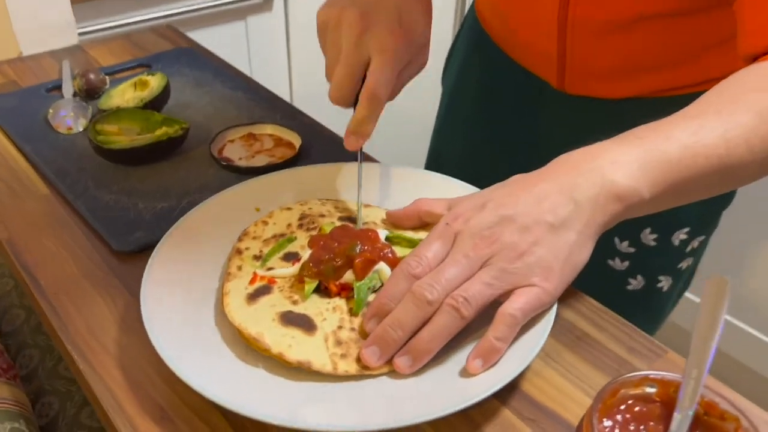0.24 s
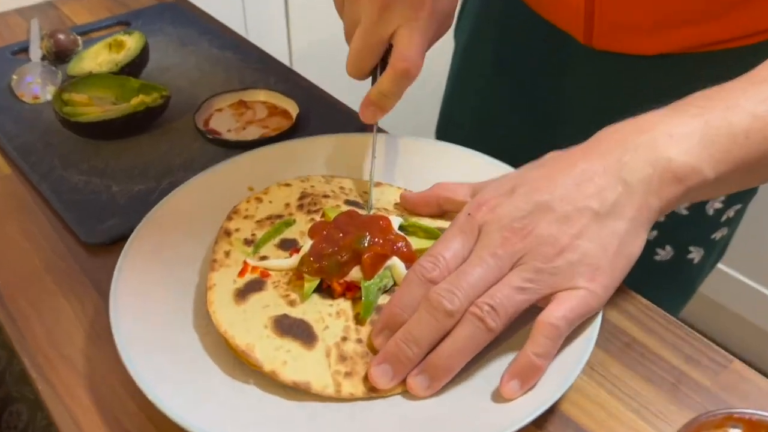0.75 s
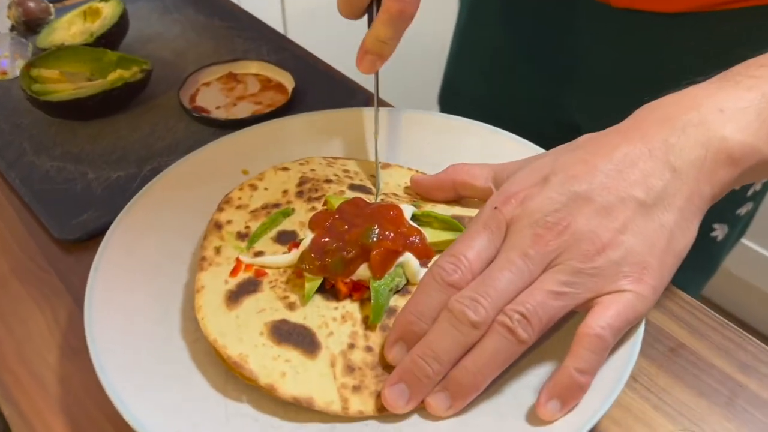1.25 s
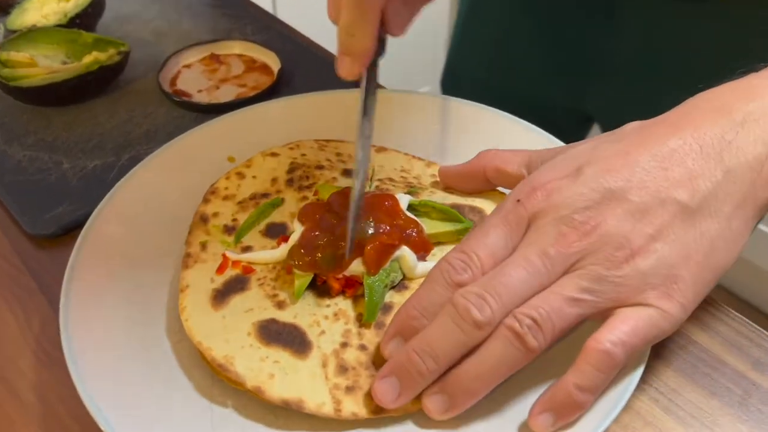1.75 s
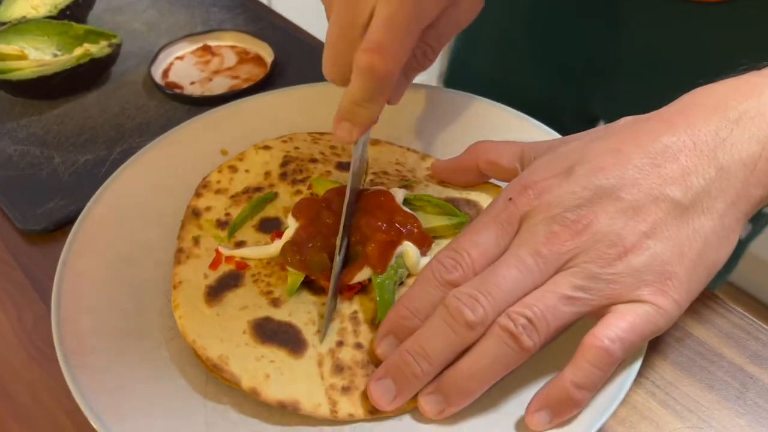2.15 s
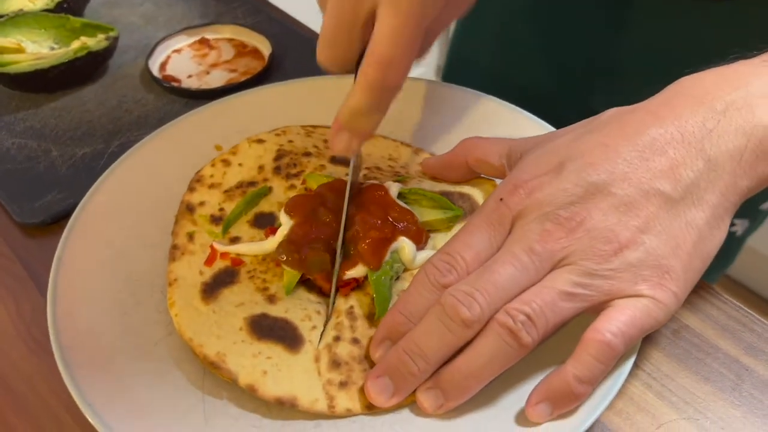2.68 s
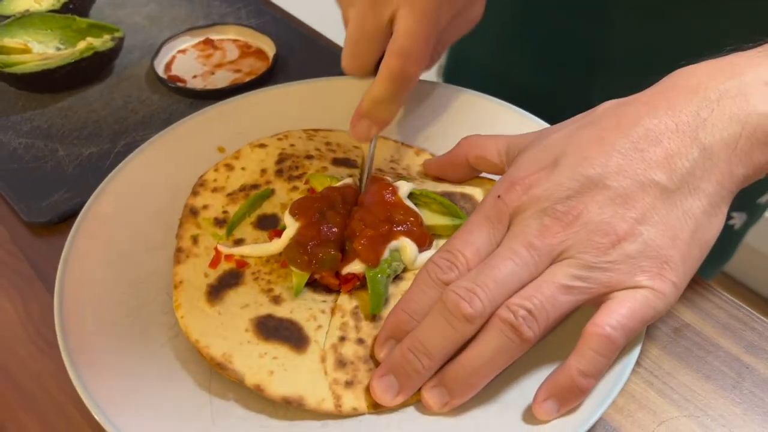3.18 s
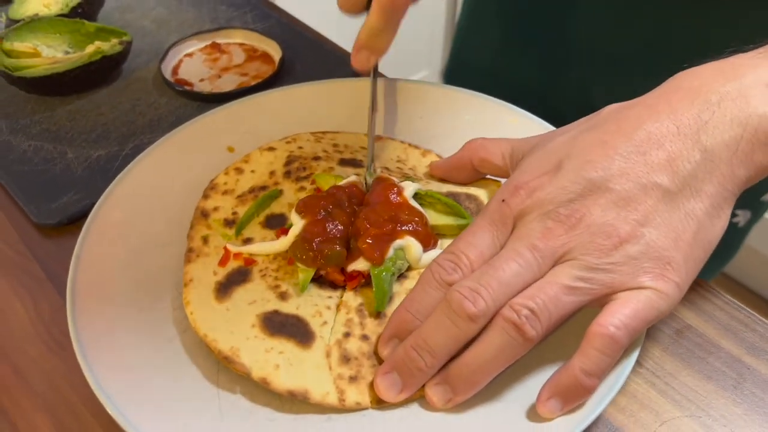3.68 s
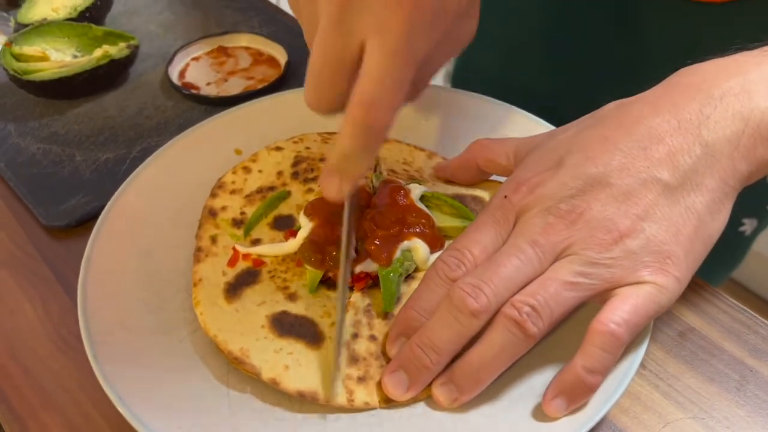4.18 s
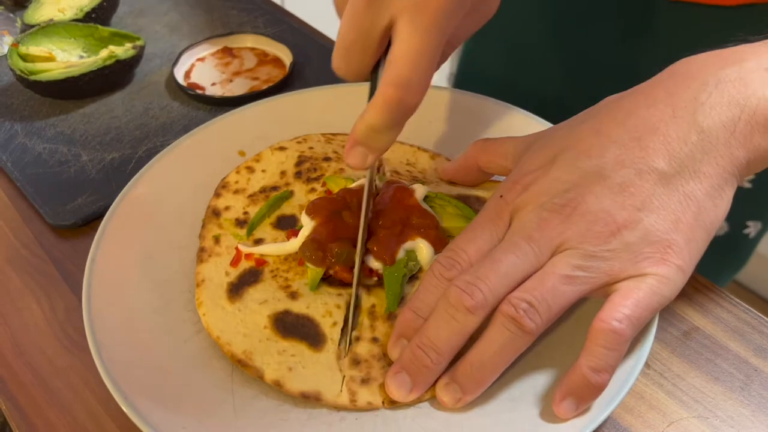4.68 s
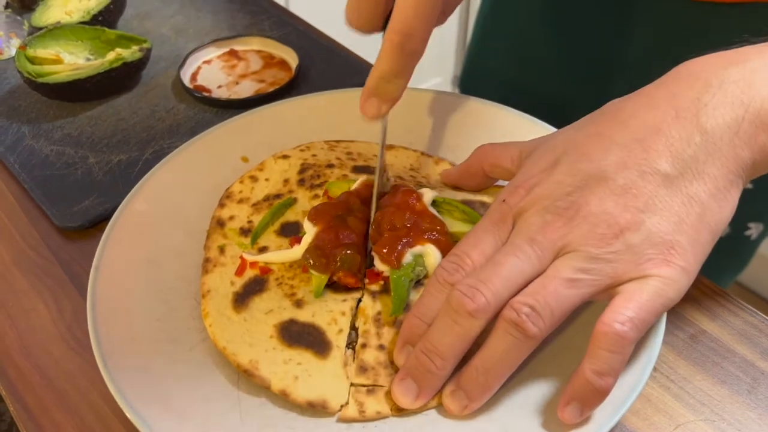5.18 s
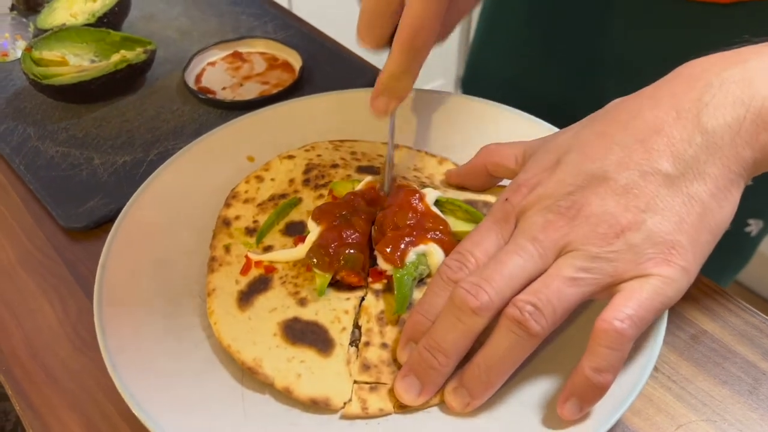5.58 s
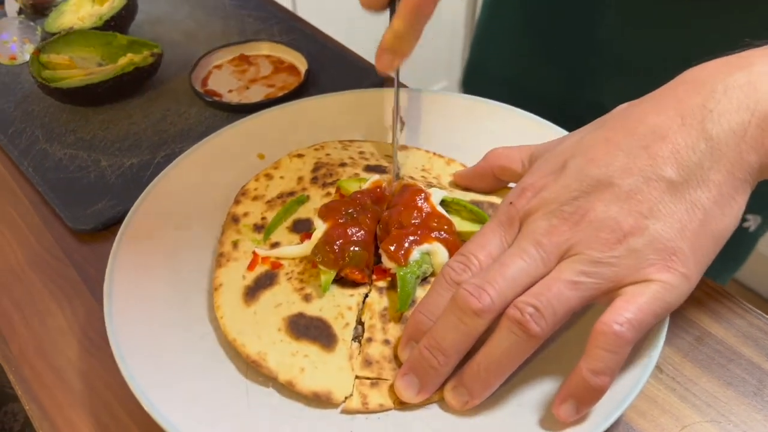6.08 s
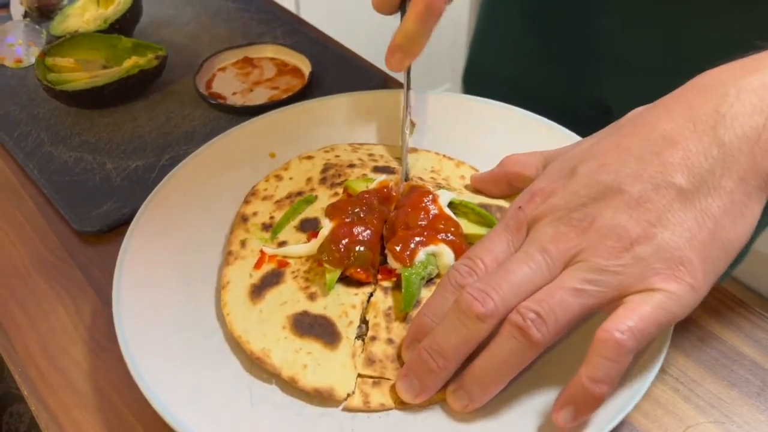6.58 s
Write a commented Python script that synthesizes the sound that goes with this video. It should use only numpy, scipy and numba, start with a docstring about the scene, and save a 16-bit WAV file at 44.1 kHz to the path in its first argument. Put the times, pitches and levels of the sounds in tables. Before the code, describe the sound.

Close stereo sound in a quiet small kitchen: a knife sawing crisp toasted flatbread on a china plate. From 0 to 0.5 s light, scratchy strokes; at 0.6 a harder rasp, and at about 0.8 a loud brittle crack with a plate knock and low thump. From 1 to 2 s it is nearly quiet, only faint brushing and soft slides. Crisp fine crackles return at 2.1-2.5, then firmer, lower rasps at 3.0, 3.25 and 3.6. A lull follows until 4.15. Between 4.2 and 4.75 comes the densest crunch: bright snaps, splintering crumbs and short ceramic knocks. After a brief pause, from 5.15 to the end at about 6.8, short regular strokes grind duller and slightly nasal, strongest near 5.4 and 5.7, with thin squeaky steel scrapes on china, soft filling rubs and muted worktop thumps.

```python
"""In a small kitchen, a knife saws to and fro through a crisp toasted flatbread on a china plate, heard close up.
Each stroke is noise gated by a stream of tiny crust fractures; larger flakes snap as sharp pulses through resonances.
Now and then the blade knocks the plate, whose modes ring; from the middle on, its edge scrapes the china.
The flat of the blade slides through the soft filling as filtered noise.
The worktop rumbles with the drag of the knife and thumps; reflections and a short diffuse tail surround it all."""
import sys
import numpy as np
from scipy import signal
from scipy.fft import rfft, irfft, next_fast_len
from scipy.io import wavfile
from scipy.ndimage import uniform_filter1d, map_coordinates
from numba import njit

SR = 44100
rng = np.random.default_rng(int(sys.argv[2]) if len(sys.argv) > 2 else 0)


def log_audio(samples):
    """Write samples as a 16-bit WAV file to the path given in sys.argv[1]."""
    # one column per channel
    frames = np.atleast_2d(samples).T
    # limit to full scale, then quantise
    limited = np.clip(frames, -1, 1)
    pcm = np.round(limited * 32767).astype(np.int16)
    wavfile.write(sys.argv[1], SR, pcm)


N = 301644

# Flakes of crust snapping. Each row: moment of the break in seconds, relative level of its first moments in dB,
# pitch in Hz, relative treble edge in dB, t60 of the splinters in seconds, relative hollow body of the bread in dB.
FLAKE_SNAPS = [(.148, -49, 3350, -25, 0.014, -22), (0.1904, -43, 2300, -33, .01, -22),
               (0.2714, -39, 2700, -5, 0.008, -18), (0.2917, -37.5, 2600, -27, 0.017, -27),
               (.593, -33, 4700, -19, 0.0044, -2), (.617, -29, 3000, -8.5, 0.0052, 0),
               (0.8125, -7.5, 4240, -9.5, 0.0059, -5.5), (0.8331, -11, 3740, -18.5, 0.0094, -12.5),
               (1.0, -38.5, 2400, -18, .011, -17), (1.0674, -39.5, 3620, -7.5, 0.0064, -19.5),
               (1.1597, -46.5, 4160, 2.5, 0.0057, -20), (1.776, -35, 2200, -44.5, 0.014, -14.5),
               (1.884, -45.5, 1195, -23, 0.013, -17.5), (1.965, -39, 1820, -36.5, .003, -6),
               (1.994, -40.5, 3950, -9, 0.01, -15), (2.0924, -35, 2160, -6, 0.034, -27),
               (2.1192, -31, 4300, -7.5, 0.0047, -10), (2.158, -32.5, 5000, 7, .006, -22),
               (2.199, -37, 2400, -8, .005, -11), (2.3306, -23.5, 12400, -4, 0.014, -16),
               (2.3412, -28.5, 12500, -5, 0.0024, -15.5), (2.4537, -23, 2540, -14.5, 0.006, -22),
               (2.461, -25.5, 13300, -16, 0.0035, -34), (2.4639, -27.5, 2100, -18.5, 0.0073, -15.5),
               (2.616, -41.5, 2640, -14, 0.0059, -7), (2.646, -35, 2670, -37, 0.011, -9),
               (2.7732, -36, 3050, -7, 0.0088, -21), (2.9287, -25.5, 2030, -17, 0.011, -9.5),
               (3.0122, -23.5, 1930, -21, 0.012, -11), (3.026, -27, 1910, -24, .008, -11),
               (3.208, -35.5, 1900, -18, 0.037, -6.5), (3.2365, -27.5, 2100, -20.5, 0.0093, -13),
               (3.274, -31, 1940, -25, 0.0074, -13), (3.2845, -25, 2050, -29, 0.0083, -21),
               (3.301, -32, 4200, -15.5, .004, -16), (3.4623, -40.5, 1850, -29.5, .005, 3),
               (4.159, -24, 1324, -31, 0.013, -20), (4.175, -30, 2300, -20, .012, -21),
               (4.191, -27.5, 2290, -20, .005, -21), (4.2307, -9.5, 4800, -10, 0.0071, -14.5),
               (4.235, -26, 8000, 1, .005, -16), (4.316, -35.5, 2290, -23.5, 0.028, -18.5),
               (4.3445, -17, 3300, -15, 0.0042, -13), (4.3444, -12, 4650, -8, 0.0041, -13),
               (4.362, -29.5, 4560, -15, .005, -14), (4.3758, -10.5, 3650, -22.5, 0.0028, -18),
               (4.403, -7.5, 4450, -5, 0.013, -22), (4.4316, -14.5, 11100, 4.5, 0.0045, -11.5),
               (4.433, -14.5, 12000, 4.5, 0.021, 0.5), (4.4386, -19, 8000, -0.5, 0.011, -7),
               (4.4988, -21, 5150, -15, 0.0062, -21.5), (4.554, -32.5, 2400, -7, 0.0066, -12),
               (4.5853, -22.5, 2300, -8.5, 0.009, -5.5), (4.599, -29, 2400, -13.5, .006, -4),
               (4.625, -31, 3000, -28, 0.0072, 5), (4.695, -24.5, 4170, 9, 0.018, -19),
               (4.701, -24, 4440, -5.5, 0.0021, -9), (4.7313, -25.5, 4180, -8.5, 0.0061, -2),
               (5.095, -38, 1940, -28.5, .024, -15), (5.1405, -38.5, 1860, -19, 0.0072, -12),
               (5.1751, -36.5, 1850, -31.5, 0.0046, -16), (5.4016, -36, 2080, -17, .008, -14),
               (5.411, -27, 2100, -27, 0.0066, -15), (5.4135, -21.5, 2120, -24.5, .016, -15),
               (5.423, -31, 2220, -34, .008, -6), (5.4312, -28.5, 1980, -36, 0.02, -2.5),
               (5.462, -34, 2270, -34, 0.013, -19), (5.483, -38.5, 2200, -24.5, .003, -13),
               (5.6894, -27.5, 2020, -23, 0.034, -26), (5.701, -23.5, 2340, -21, 0.029, -10.5),
               (6.1946, -34.5, 2030, -27, 0.01, 0), (6.353, -39, 1980, -36, 0.011, -16),
               (6.596, -35.5, 2030, -21, .014, -25), (6.738, -31, 1890, -23, 0.0068, -4),
               (6.7449, -25.5, 1690, -16, 0.016, -4), (6.7591, -30, 2540, -20, 0.0037, -4),
               (6.7801, -38, 2700, -20, .005, -9), (6.791, -41, 2350, -30, .007, -14)]
# Modes of the loaded plate. Each row: pitch in Hz, relative level in dB, t60 in seconds.
PLATE_MODES = [(236, -11, .14), (284, -10, .12), (438, -4, .08), (494, -3, .08), (632, -3, .1),
               (716, -8, .07), (1160, -12, .04), (1290, 0, .1), (1385, -10, .06), (1710, -2, .08),
               (1949, -1, .18), (2149, -11, .06), (2692, -10, .07), (3600, -11, .05)]
STRAIN_S = .004  # a flake creaks this long before it breaks
MEDIUM_DB = -49.5  # the level of a middling stroke


def amp(db):
    """Decibels to gain."""
    return 10 ** (np.asarray(db) / 20)


def unit(x):
    """Scale to rms 1."""
    return x / np.sqrt(np.mean(x ** 2) + 1e-20)


def along(points, hz):
    """Read (Hz, value) points on a log frequency axis."""
    f, v = np.transpose(points)
    return np.interp(np.log(hz + 1), np.log(f + 1), v)


def curves(rows):
    """One value per sample for each column after the time."""
    s, *cols = np.transpose(rows)
    return [np.interp(np.arange(N) / SR, s, c) for c in cols]


def wobble(rate):
    """A smooth random curve with this many knots a second."""
    return map_coordinates(rng.standard_normal(int(N * rate / SR) + 4), [np.arange(N) * rate / SR])


def add(track, s, sound):
    """Mix a sound into the track at time s."""
    part = track[max(round(s * SR), 0):][:len(sound)]
    part += sound[:len(part)]


def filtered(x, response):
    """Multiply the spectrum of x by a response of frequency."""
    n = x.shape[-1]
    m = next_fast_len(n + 8192)
    return irfft(rfft(x, m) * response(np.fft.rfftfreq(m, 1 / SR)), m)[..., :n]


def impulse(gain, size=4096):
    """The causal pulse whose spectrum is gain(Hz), by folding its cepstrum forward in time."""
    cepstrum = irfft(np.log(np.maximum(gain(np.fft.rfftfreq(size, 1 / SR)), 1e-6)))
    cepstrum[1:size // 2] *= 2
    cepstrum[size // 2 + 1:] = 0
    return irfft(np.exp(rfft(cepstrum)))


def coloured(x, spectrum):
    """x through a causal (Hz, dB) colour, at rms 1."""
    return unit(signal.fftconvolve(x, impulse(lambda hz: amp(along(spectrum, hz))))[:N])


def noise(spectrum):
    """Steady noise with a (Hz, dB) colour, at rms 1."""
    return unit(filtered(rng.standard_normal(N), lambda hz: amp(along(spectrum, hz))))


def resonances(table, f):
    """Causal response of (Hz, width Hz, dB) resonances of alternating sign."""
    total = 0
    for k, (c, w, db) in enumerate(table):
        total = total + (-1) ** k * amp(db) * 1j * f * w / (c * c - f * f + 1j * f * w)
    return total


def varied(table, detune, uneven_db):
    """The resonances as one spot of contact excites them: a little off pitch, each stronger or weaker."""
    return [(c * (1 + detune * rng.standard_normal()), w, db + uneven_db * rng.standard_normal())
            for c, w, db in table]


@njit
def glide(x, pitch, damping):
    """A resonance whose pitch (cycles per sample) moves."""
    out, low, band = np.zeros(len(x)), 0., 0.
    for i in range(len(x)):
        step = 2 * np.sin(np.pi * pitch[i])
        low += step * band
        band += step * (x[i] - low - damping * band)
        out[i] = band
    return out


def quiet_air():
    """A steady noise floor, one part common to both channels and one separate in each."""
    # Colour of the quiet. Each row: frequency in Hz, relative level in dB.
    quiet = [(15, -30), (35, -2), (80, 3), (250, -13), (700, -14), (1500, -12.5), (2500, -34), (5000, -39),
             (16000, -33.5)]
    return amp(-72.5) * noise(quiet) + amp(-67.0) * np.array([noise(quiet), noise(quiet)])


def kitchen(x):
    """A diffuse tail, alike at both microphones in the bass and unrelated in the treble."""
    # Decay of the kitchen. Each row: frequency in Hz, t60 in seconds.
    decay = [(150, 0.67), (1000, 0.12), (4000, 0.08), (14000, 0.075)]
    hz, t, z = signal.stft(rng.standard_normal((2, SR // 2)), SR, nperseg=256)
    apart = np.clip(hz / 1200, 0, 1)[:, None]
    z = np.array([z[0] + apart * z[1], z[0] - apart * z[1]]) / np.hypot(1, apart)
    tail = signal.istft(z * amp(-60 * t / along(decay, hz)[:, None]), SR, nperseg=256)[1]
    delayed = np.pad(x, (round(0.0035 * SR), 0))[None]
    return signal.fftconvolve(delayed, tail / np.linalg.norm(tail[0]), axes=1)[:, :N]


def nearby(x):
    """Dense reflections off the worktop and the cook reach the two microphones with opposite sign."""
    # Strength of these reflections. Each row: frequency in Hz, level in dB.
    width = [(60, -16), (150, -9), (500, -8), (1300, -7), (3500, -15), (7000, -12), (14000, -28.5)]
    t = np.arange(SR // 16) / SR
    echoes = rng.standard_normal(len(t)) * amp(-60 * t / .04) * (1 - np.exp(-t / .002))
    side = signal.fftconvolve(x, echoes / np.linalg.norm(echoes))[:N]
    return np.array([[1], [-1]]) * filtered(side, lambda hz: amp(along(width, hz)))


def worktop(drag_db, rumble_db=-56.0, follow=0.36, unsteady_db=3.0, thump_t60=0.1, sag=0.88, sag_s=0.012):
    """Low noise follows the drag of the knife; the hand rocks the plate: decaying sines that sag in pitch."""
    # Colour of the rumble. Each row: frequency in Hz, relative level in dB.
    rumble = [(12, -30.5), (20, -13.5), (36, -6), (54, 6), (118, -9.5), (170, -7), (220, -33), (370, -120)]
    # Extra rumble from the weight of the hands. Each row: time in seconds, change in dB.
    leaning = [(0, -0.5), (.85, 3.5), (1.4, -3), (2.3, 1), (3.5, -1.5), (4.6, 1), (5.2, 0), (6.8, 5)]
    # Thumps of the rocked plate. Each row: start in seconds, relative level in dB, settled pitch in Hz.
    thumps = [(.835, -32, 180), (4.453, -37.5, 238), (4.732, -44, 60), (5.276, -47, 173), (5.56, -49, 52),
              (6.425, -43, 50), (6.554, -38, 56), (6.68, -38, 58), (6.791, -30.5, 80.5)]
    push_db = uniform_filter1d(drag_db, SR // 10) - MEDIUM_DB
    lean_db, = curves(leaning)
    level_db = rumble_db + lean_db + follow * push_db + unsteady_db * wobble(8.4)
    track = amp(level_db) * noise(rumble)
    t = np.arange(SR // 4) / SR
    for s, db, hz in thumps:
        cycles = np.cumsum(hz * (1 + sag * np.exp(-t / sag_s))) / SR
        onset = 1 - np.exp(-t / 0.0021)
        add(track, s, amp(db - 60 * t / thump_t60) * np.sin(2 * np.pi * cycles) * onset)
    return track


def plate(x):
    """The plate's modes ring along with whatever rubs on it."""
    hz, mode_db, t60 = np.transpose(PLATE_MODES)[:, :, None]
    t = np.arange(SR // 5) / SR
    ring = (amp(mode_db - 60 * t / t60) * np.cos(2 * np.pi * hz * t)).sum(0)
    return unit(signal.fftconvolve(x, ring)[:N])


def knocking():
    """The blade lands and the plate's modes ring briefly, damped by the bread and the hand on it."""
    # Knocks on the plate. Each row: start in seconds, relative level in dB, pitch in Hz that this spot favours.
    knocks = [(.8335, -22.5, 1103), (4.159, -38, 1150), (4.2314, -31, 1300), (4.233, -32, 500),
              (4.3445, -29.5, 1200), (4.404, -28.5, 1330), (4.4345, -23, 480), (4.4365, -27.5, 1330),
              (4.4516, -16.5, 1800), (4.4525, -22, 620), (4.701, -36, 551), (4.731, -34.5, 702),
              (5.2741, -44, 500), (5.413, -34, 1196), (6.744, -34, 1000)]
    track, t = np.zeros(N), np.arange(SR // 4) / SR
    hz, mode_db, t60 = np.transpose(PLATE_MODES)[:, :, None]
    for s, db, spot_hz in knocks:
        favoured_db = -9 * abs(np.log2(hz / spot_hz))
        sign = rng.choice([-1, 1], hz.shape)
        strength = amp(mode_db + favoured_db + rng.normal(0, 1, hz.shape)) * sign
        ring = (strength * amp(-60 * t / t60) * np.sin(2 * np.pi * hz * t)).sum(0)
        contact = 1 + 2 * np.exp(-t / 0.0068)  # the first swings are quickly soaked up
        add(track, s, amp(db - 7.5) * ring * contact)
    return track


def scraping(waver=0.008, waver_rate=30, catch_db=3.0):
    """Steel chatters on bare china: noise through resonances that waver as the contact point slides."""
    # Scrapes. Each row: middle in seconds, length in seconds, relative level in dB,
    # lowest note of the blade in Hz, relative level of its upper resonances in dB.
    scrapes = [(2.835, 0.096, -53, 1760, -10), (3.386, .12, -59.5, 1720, -15), (3.483, .07, -52, 1760, -21),
               (5.165, 0.034, -47.5, 1780, -13.5), (5.373, 0.037, -51, 1780, -8.5),
               (5.56, 0.084, -46.5, 1760, -24), (5.652, 0.069, -46, 1810, -22),
               (5.695, .03, -37, 1940, -13), (5.81, 0.067, -42, 1860, -6), (5.943, .11, -41, 2000, -4.5),
               (6.066, 0.063, -45.5, 2020, -2), (6.103, 0.037, -46.5, 1710, -9),
               (6.333, .12, -54.5, 1990, -2.5), (6.591, 0.078, -44, 2080, -5.5), (6.71, .062, -51, 1890, 2)]
    # Upper resonances of the blade. Each row: pitch in Hz, width in Hz, relative level in dB.
    blade = [(3780, 200, -2), (4960, 140, 0), (6430, 180, 1), (8300, 200, -8), (12800, 200, -6)]
    note_width_hz, note_db = 99, 3  # the lowest resonance, which moves with the point of contact
    track = np.zeros(N)
    speed = 1 + waver * wobble(waver_rate)
    chatter = rng.standard_normal(N) * amp(catch_db * wobble(140))
    for s, length, db, note_hz, upper_db in scrapes:
        start = round((s - length / 2) * SR)
        span = slice(start, start + round(length * SR))
        upper = varied(blade, detune=.008, uneven_db=2.5)
        steel = [(note_hz, note_width_hz, note_db)]
        steel += [(hz, width, level + upper_db) for hz, width, level in upper]
        ringing = filtered(chatter[span], lambda f: resonances(steel, f))
        song = map_coordinates(ringing, [np.cumsum(speed[span])])  # uneven reading speed bends the pitch
        swell = np.sin(np.linspace(0, np.pi, len(song)))
        add(track, start / SR, amp(db) * swell * unit(song))
    return track


def sliding():
    """The flat of the blade slides through the soft filling as it is drawn back: swells of coloured noise."""
    # Slides. Each row: middle in seconds, length in seconds, relative level in dB.
    slides = [(1.319, 0.23, -49.5), (4.05, 0.26, -59.5), (5.553, 0.054, -51), (5.76, 0.052, -46.5),
              (6.13, 0.056, -48.5), (6.509, 0.046, -42), (6.812, 0.08, -44.5)]
    # Colour of the filling. Each row: frequency in Hz, relative level in dB.
    filling = [(120, -10), (300, 5), (550, 2), (800, -1.5), (1150, 2.5), (1700, -17.5), (2300, -6),
               (3200, -36), (9000, -34.5)]
    t = np.arange(N) / SR
    swell = sum(amp(db) * np.cos(np.pi * np.clip((t - s) / length, -.5, .5)) for s, length, db in slides)
    return swell * noise(filling)


def snap(db, pitch_hz, edge_db, t60, body_db, sharpness=5.6, crumble_db=-23, crumble_t60=0.12,
         splinter_share=.25, crumb_share=.02, strain_db=-29):
    """A flake strains, breaks in a pulse, splinters, then crumbles; the sheet of bread rings with it."""
    # Ring of the stiff sheet of bread. Each row: pitch in Hz, width in Hz, relative level in dB.
    sheet_modes = [(1760, 87, -10.5), (2190, 260, -4), (3160, 770, -7.5)]
    # Its low, hollow body, stirred when a crack runs right through; the same columns.
    hollow_modes = [(540, 240, -1.4), (1160, 280, -0.97)]
    t = np.arange(SR // 10) / SR
    crumbs = rng.standard_normal(len(t)) * (rng.random(len(t)) < crumb_share)
    splinters = rng.standard_normal(len(t)) * (rng.random(len(t)) < splinter_share)
    tearing = amp(-60 * t / t60) * unit(splinters) + amp(crumble_db - 60 * t / crumble_t60) * unit(crumbs)
    force = .18 * tearing
    force[0] = 1  # the break itself
    lead = round(STRAIN_S * SR)
    strain = amp(strain_db) * np.linspace(0, 1, lead) ** 2 * rng.standard_normal(lead)
    force = np.concatenate([strain, force])
    sheet = varied(sheet_modes, detune=.03, uneven_db=2)
    hollow = varied(hollow_modes, detune=.04, uneven_db=2)

    def colour(f):
        flake = 1 / np.hypot(1, sharpness * (f / pitch_hz - pitch_hz / (f + 1))) ** 1.25
        edge = amp(edge_db + 2.5) * f / np.hypot(f, 6000) * f / np.hypot(f, 2500)
        body = abs(resonances(sheet, f) + amp(body_db) * resonances(hollow, f))
        return np.sqrt(flake ** 2 + edge ** 2 + body ** 2)

    sound = signal.fftconvolve(force, impulse(colour, size=2048))
    first = sound[lead:lead + round(.006 * SR)]  # the level is set over the first 6 ms of the break
    return amp(db - 4.5) * sound / np.sqrt(np.mean(first ** 2))


def snapping():
    """The larger flakes break one by one."""
    track = np.zeros(N)
    for s, *flake in FLAKE_SNAPS:
        add(track, s - STRAIN_S, snap(*flake))
    return track


def chipping(rasp_db, note_hz, count=130, middling_db=-48, follow=0.76, spread_db=9, scatter=.2):
    """Small chips snap at random near the note of the stroke, harder when it presses; a few are larger."""
    track = np.zeros(N)
    for k, (place, size, pitch) in enumerate(rng.random((count, 3))):
        i = int((k + place) * N / count)
        db = middling_db + follow * (rasp_db[i] - MEDIUM_DB) + spread_db * (size ** 3 - 1 / 2)
        chip_hz = note_hz[i] * (1 + scatter * (2 * pitch - 1))
        add(track, i / SR, snap(db, chip_hz, edge_db=-13.5, t60=.005, body_db=-14.5))
    return track


def grit(rasp_db, fizz_db, rate=100, spread_db=6.0, peak_db=11.0, life_cycles=1.3):
    """Single larger crumbs tick out of the rasp as brief decaying sines, each at its own pitch."""
    track, t = np.zeros(N), np.arange(SR // 200) / SR
    for place, size, pitch in rng.random((int(rate * N / SR), 3)):
        i, hz = int(place * N), 1500 * 4.5 ** pitch
        # low ticks follow the rasp, high ones the fizz
        stroke_db = np.interp(pitch, [0, 1], [rasp_db[i], fizz_db[i]])
        tick = np.sin(2 * np.pi * hz * t) * np.exp(-t * hz / life_cycles)
        add(track, i / SR, amp(stroke_db + spread_db * (2 * size - 1) + peak_db) * tick)
    return track


def effort():
    """Strokes swell, hold and die by one rule; the stroke nearest its hold weighs most in the note of bread and
    blade."""
    # Pushes and pulls of the knife. Each row: middle of the effort in seconds, rise, hold and fall in seconds,
    # relative levels in dB of the rasp of the crust, the fizz of fine crumbs and the drag of the dough,
    # note of bread and blade in Hz, level of that note over the broad rasp in dB.
    strokes = [(0, .02, .004, .025, -49, -48.5, -55, 2393, -4),
               (0.124, .06, 0.018, 0.041, -45.5, -49, -48, 2300, -5),
               (0.208, .03, .05, .035, -54, -54.5, -54, 2424, 5),
               (0.381, 0.093, 0.064, .04, -42.5, -42, -50.5, 2700, 0.5),
               (0.613, 0.046, 0.028, 0.041, -33.5, -34.5, -41, 2100, -18.5),
               (0.751, .04, 0.019, .01, -40.5, -41, -45.5, 2100, -9),
               (0.853, 0.036, 0.022, 0.11, -37.5, -32.5, -41, 2000, -12.5),
               (1.294, 0.058, .02, .05, -53.5, -48.5, -71, 2100, -17.5),
               (1.385, 0.068, 0.037, 0.064, -54, -49, -58.5, 2112, -12.5),
               (1.724, .11, .04, 0.15, -60, -61, -54.5, 2144, 3.5),
               (2.008, 0.052, 0.023, .045, -63, -62.5, -64.5, 2310, 11.5),
               (2.174, 0.056, .04, 0.064, -45, -42.5, -51, 2315, 4.5),
               (2.505, 0.053, .02, 0.033, -52.5, -46.5, -49.5, 2400, 3.5),
               (2.657, 0.032, 0.036, 0.098, -46.5, -50.5, -53, 2640, -0.5),
               (2.835, .04, .025, .055, -48.5, -48, -51, 2100, -3.5),
               (3.032, .04, 0.0091, 0.02, -29.5, -29.5, -35.5, 1980, 2),
               (3.123, 0.083, .015, 0.034, -45, -44.5, -47, 1993, -14.5),
               (3.257, 0.021, 0.046, 0.042, -31.5, -32, -40, 2074, -1.5),
               (3.485, 0.042, .012, .056, -51, -53.5, -48.5, 1970, -9.5),
               (3.612, 0.031, 0.013, 0.066, -35.5, -33, -42, 2110, 2),
               (3.759, 0.054, .02, 0.031, -51.5, -49.5, -58, 2112, -4.5),
               (4.173, 0.011, .004, 0.096, -43, -42, -52.5, 2246, 1.5),
               (4.362, .08, 0.028, 0.055, -42, -34.5, -43.5, 2277, -1.5),
               (4.443, .018, .014, 0.026, -30, -23.5, -34, 1993, -9),
               (4.588, 0.082, 0.035, 0.033, -34.5, -34.5, -42, 2305, -0.5),
               (4.72, 0.042, .03, 0.038, -45, -42.5, -42, 2195, -11.5),
               (4.83, .05, 0.022, 0.049, -58, -50, -53.5, 2095, -2),
               (5.159, 0.032, 0.021, 0.0448, -44.5, -47.5, -48, 1834, -8),
               (5.288, .018, .008, 0.039, -51, -57, -44, 1882, -1.5),
               (5.421, 0.02, .02, 0.045, -33.5, -39, -41.5, 2240, 1),
               (5.539, 0.12, .05, 0.045, -47, -56.5, -47.5, 1765, -5.5),
               (5.7, 0.03, .012, 0.036, -33, -34.5, -40, 2160, 1),
               (5.821, 0.024, .03, 0.024, -42, -49, -47.5, 1900, 0),
               (5.964, .045, .06, .026, -41.5, -42.5, -46, 2050, 1),
               (6.075, 0.032, 0.029, 0.076, -45.5, -50.5, -44.5, 1692, -2.5),
               (6.21, 0.033, .035, 0.024, -42.5, -41, -47.5, 2204, -5),
               (6.33, 0.046, 0.069, 0.076, -52.5, -54, -48.5, 2005, 0.5),
               (6.479, .038, 0.027, 0.027, -41, -40.5, -44, 1730, -6.5),
               (6.591, 0.033, .04, 0.026, -48, -50, -43.5, 2072, 5.5),
               (6.738, 0.045, .05, .025, -44.5, -41.5, -43.5, 1880, -7),
               (6.825, .02, 0.03, 0.037, -43, -46, -45, 1873, -18.5)]
    # The blade lying in the cut: relative levels of rasp, fizz and drag in dB.
    resting = [-76.5, -84, -80]
    # a stroke is edge_db down one rise before and one fall after its hold; roundness is the power of that slope
    edge_db, roundness = 13, 1.06
    t = np.arange(0, N, 64) / SR
    s, rise, hold, fall, rasp_db, fizz_db, drag_db, note_hz, note_db = np.transpose(strokes)[:, :, None]
    away = np.maximum(np.maximum((s - hold / 2 - t) / rise, (t - s - hold / 2) / fall), 0)
    swell_db = -np.minimum(edge_db * abs(away) ** roundness, 200)
    levels = []
    for db, rest_db in zip((rasp_db, fizz_db, drag_db), resting):
        power = (amp(db + swell_db) ** 2).sum(0) + amp(rest_db) ** 2
        levels.append(10 * np.log10(power))
    share = amp(swell_db) / amp(swell_db).sum(0)
    return curves(np.transpose([t, *levels, (share * note_hz).sum(0), (share * note_db).sum(0)]))


def fractures(rate, spread_db, life, bed):
    """Envelope of tiny breaks of uneven size, each dying within its life, over a bed of smooth friction."""
    sizes = amp(spread_db * np.minimum(rng.standard_normal(N), 2))
    breaks = sizes ** 2 * (rng.random(N) < rate / SR)
    power = signal.lfilter([1], [1, -np.exp(-1 / (life * SR))], breaks)
    return unit(np.sqrt(power / power.mean() + bed))


def relief():
    """After each snap the blade slips free for a few milliseconds, so the rasp dips."""
    slack = np.zeros(N)
    for s, *_ in FLAKE_SNAPS:
        add(slack, s + .002, np.hanning(round(.007 * SR)))
    return 1 - .6 * np.minimum(slack, 1)


def judder(rasp_db, depth=0.75, uneven=0.1, slip_cycles=0.4):
    """Pressed hard, the edge sticks and slips, so that the breaks come in bursts."""
    slips_hz, above_db, range_db = 102, -37, 9.5  # rasp level where slips begin, and the rise to full depth
    phase = np.cumsum(slips_hz * (1 + uneven * wobble(60))) / SR % 1
    bursts = unit(np.exp(-phase / slip_cycles))
    share = depth * np.clip((rasp_db - above_db) / range_db, 0, 1)
    return np.sqrt(1 - share + share * bursts ** 2)


def shifting(x, patchy_db=3.0):
    """The colour shifts from moment to moment as the edge meets other crust."""
    z = signal.stft(x, nperseg=256)[2]
    patches = uniform_filter1d(rng.standard_normal(z.shape), size=4, axis=0)
    patches = uniform_filter1d(patches, size=6, axis=1)
    return signal.istft(z * amp(patchy_db * unit(patches)), nperseg=256)[1][:N]


def wedged(x):
    """Wedged in the filling, blade and bread lose upper ring and bite with a compact, nasal tone."""
    # How firmly the blade is wedged. Each row: time in seconds, share (only 0 to 1 counts).
    wedging = [(2.86, -1.5), (2.92, -0.44), (3.3, 0), (3.65, 0.15), (3.9, 0), (5.34, 0), (5.39, 0.5),
               (5.46, 0.5), (5.52, -0.5)]
    # Colour of a wedged cut. Each row: frequency in Hz, gain in dB.
    wedged_colour = [(300, -2.5), (1100, 3.5), (1600, 0.5), (2400, 2.5), (2900, -11.5), (3600, -16),
                     (4350, 7), (5400, 1), (7000, -0.5)]
    share = np.clip(curves(wedging)[0], 0, 1)
    damped = signal.fftconvolve(x, impulse(lambda hz: amp(along(wedged_colour, hz))))[:N]
    return (1 - share) * x + share * damped


def sawing(rasp_db, fizz_db, drag_db, bite_hz, bite_db):
    """Streams of breaks excite the crust and its crumbs; the soft dough drags below."""
    # Colours of the dry rim, the filled middle, the crumbs, the finest crackle and the dough.
    # Each row: frequency in Hz, relative level in dB.
    rim, middle = [(300, -27.5), (800, -6), (1250, 4), (1600, -0.5), (2100, 2), (3200, -0.5), (4500, -17),
                   (8000, -33.5)], [(300, -17), (750, -4), (1250, 2), (1550, -1), (1800, 7.5), (2500, -4),
                                (3300, -11.5), (4500, -12.5), (8000, -30)]
    crumb_colour, flake_colour = [(1500, -23), (3000, 5.5), (4400, 3.5), (5800, -1), (8000, -8.5),
                                  (11000, -26.5), (16000, -15)], [(4000, -15), (8000, 1), (10500, -3), (13000, -2),
                                                  (15300, -4.5), (16500, -24.5)]
    dough_colour = [(60, -23), (150, 0), (240, 3), (340, -0.5), (470, -2.5), (630, -2), (850, -4),
                    (1400, -13.5), (3000, -66)]
    # Dryness of the crust. Each row: time in seconds, finest crackle over the crumbs in dB.
    dryness = [(.6, -5.5), (.9, -4.5), (2.15, 3.5), (2.7, 5.5), (3.05, -3), (4.3, -4.5), (4.6, 3),
               (5.2, -2), (6.8, -1.5)]
    dry_db, = curves(dryness)
    clumps = amp(0.92 * wobble(70))
    grain = unit(clumps * relief()) * judder(rasp_db)
    grain = grain * fractures(rate=300, spread_db=1.0, life=0.0046, bed=0.4)

    def crackle():
        return grain * rng.standard_normal(N)

    # the tone drops as the blade moves from the dry rim into the filled middle
    depth, = curves([(2.75, 0.11), (2.95, 1)])
    crust = np.sqrt(1 - depth) * coloured(crackle(), rim) + np.sqrt(depth) * coloured(crackle(), middle)
    pitch = bite_hz * (1 + 0.063 * wobble(40)) / SR  # the contact point shifts from break to break
    note = unit(glide(glide(crackle(), pitch, .24), pitch, .24))
    pressure_db = 0.13 * np.minimum(rasp_db + 37.5, 0)  # a light touch wakes the note less
    crust = shifting(crust + amp(bite_db + pressure_db) * note)
    crust = unit(crust + amp(-10.5) * plate(coloured(crackle(), middle)))
    fine = fractures(rate=340, spread_db=3.5, life=0.00066, bed=7.0)
    crumbs = coloured(fine * crackle(), crumb_colour)
    crumbs = unit(crumbs + amp(dry_db) * coloured(fine * crackle(), flake_colour))
    dough = coloured(crackle(), dough_colour)
    dough = unit(dough + amp(-5.5) * plate(coloured(crackle(), dough_colour)))
    return amp(rasp_db + 0.92) * crust + amp(fizz_db - 3.5) * crumbs + amp(drag_db - 2.0) * dough


def scene():
    """Knife, bread and plate in the quiet kitchen."""
    rasp_db, fizz_db, drag_db, bite_hz, bite_db = effort()
    cutting = sawing(rasp_db, fizz_db, drag_db, bite_hz, bite_db)
    cutting = cutting + grit(rasp_db, fizz_db) + chipping(rasp_db, bite_hz)
    strokes = amp(-1.98) * (wedged(cutting) + scraping() + sliding())
    hits = wedged(snapping()) + knocking()
    air = quiet_air()
    room = nearby(strokes + hits) + kitchen(amp(-10.5) * strokes + amp(-14.5) * hits)
    return strokes + hits + room + worktop(drag_db) + air


def record(dry):
    """The two microphones differ in phase and level; a steep slope cuts the extreme treble."""
    # Phase between the microphones. Each row: frequency in Hz, lead of the left in radians.
    lead = [(100, 0), (1900, 0), (3200, 1.3), (4300, .2), (5400, -.55), (6400, 0), (7400, 0), (8100, -.7),
            (9100, -2.7), (10900, -3.6), (12000, -6), (13700, -6.4), (15100, -9.3)]
    # Level between them. Each row: frequency in Hz, left minus right in dB.
    balance = [(100, .3), (380, -1), (900, .5), (2000, .5), (3900, 5.5), (5500, 2), (8000, .7), (15000, 0)]
    top_hz = 16100
    side = np.array([[.5], [-.5]])
    pair = filtered(dry, lambda hz: amp(side * along(balance, hz)) * np.exp(1j * side * along(lead, hz)))
    return filtered(np.clip(pair, -1, 1), lambda hz: 1 / np.hypot(1, (hz / top_hz) ** 50))


dry = scene()
out = record(dry)
log_audio(out)
```